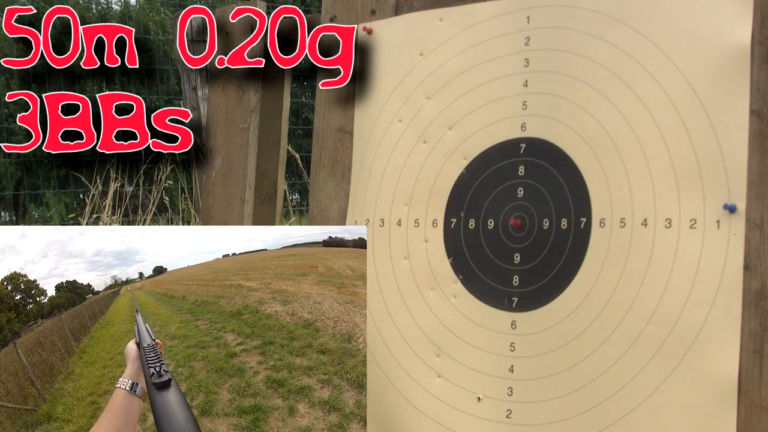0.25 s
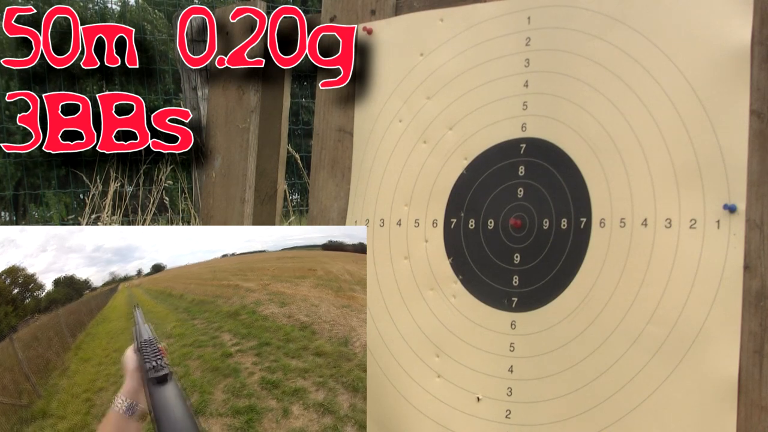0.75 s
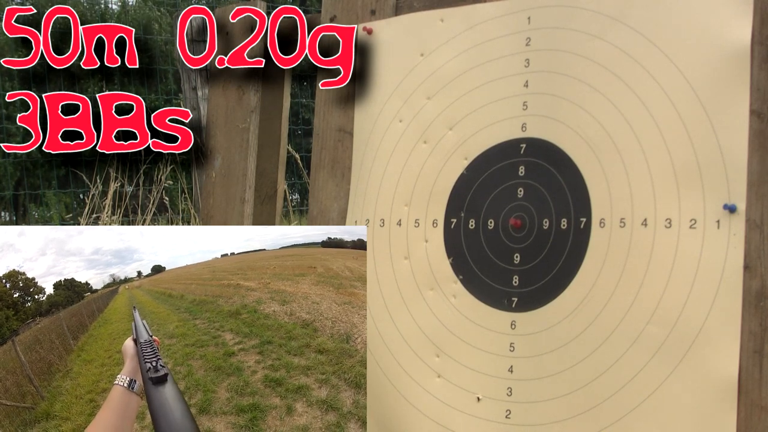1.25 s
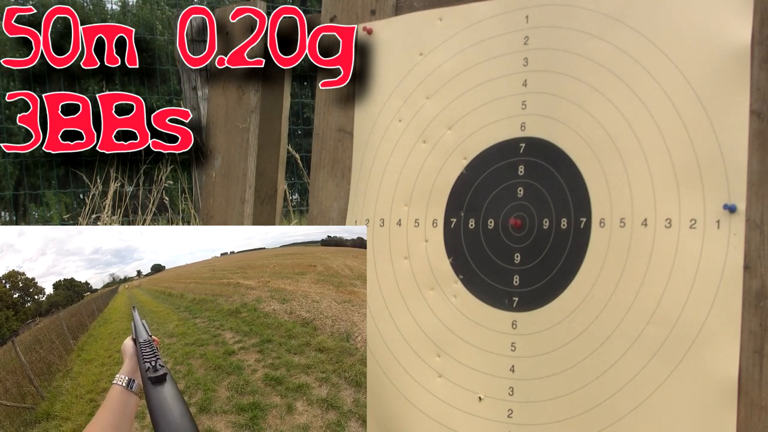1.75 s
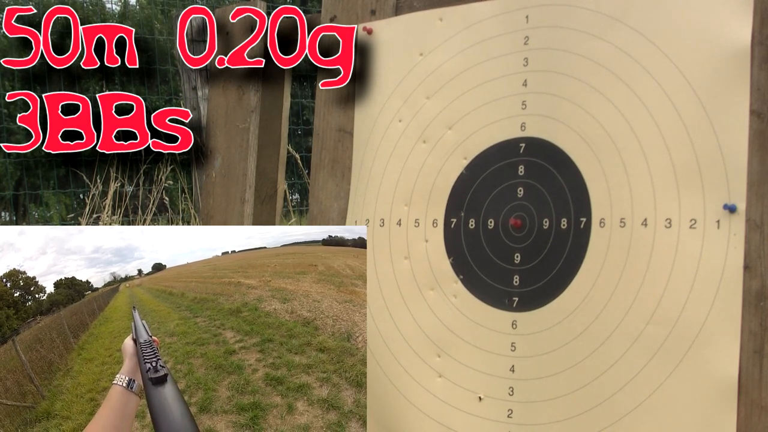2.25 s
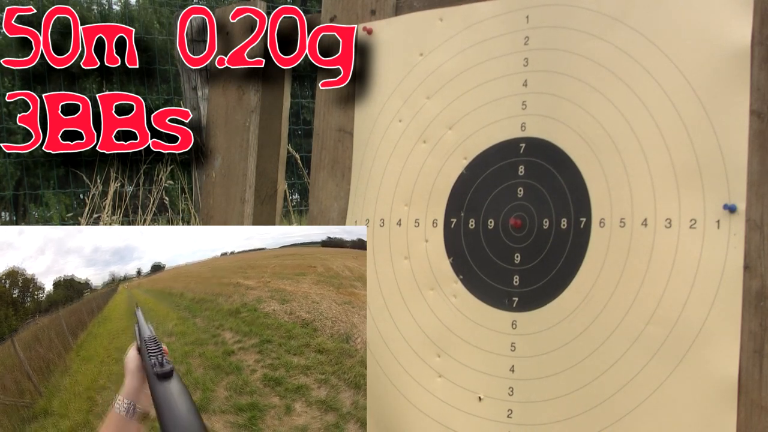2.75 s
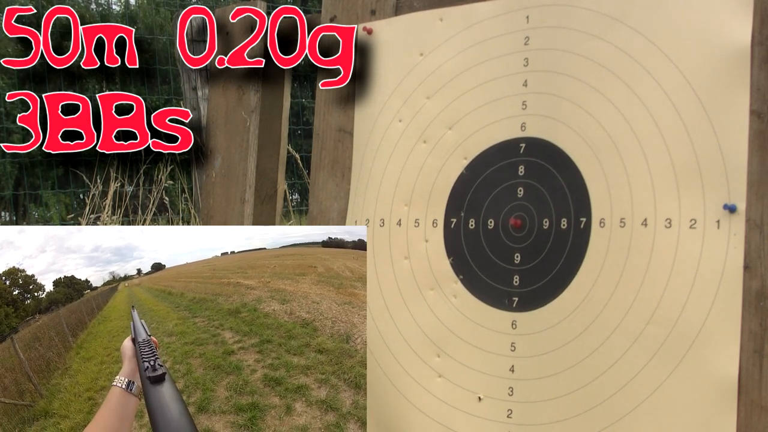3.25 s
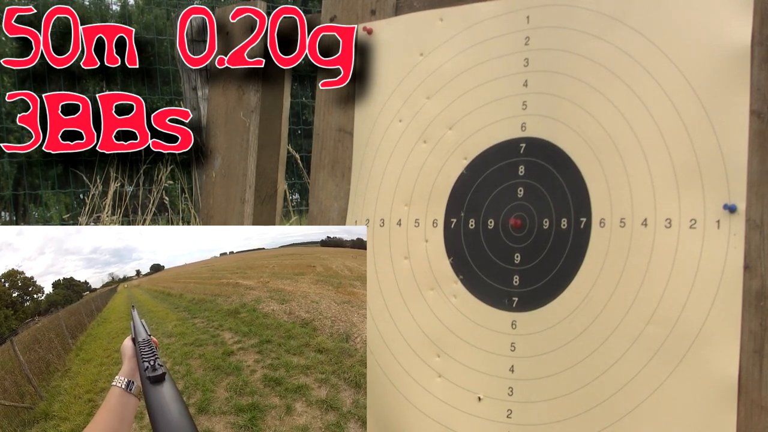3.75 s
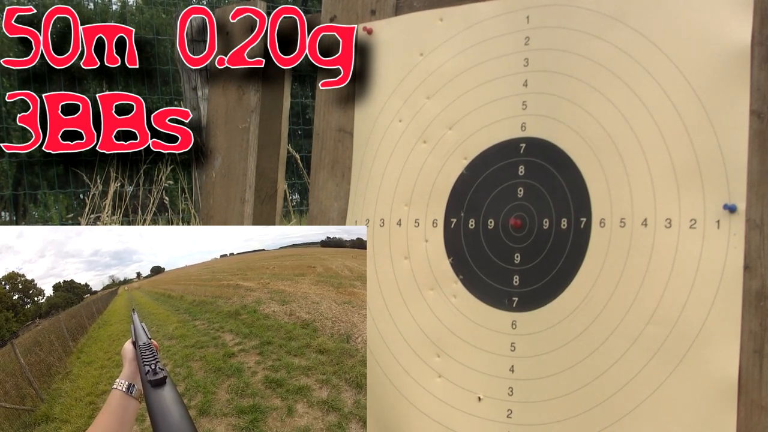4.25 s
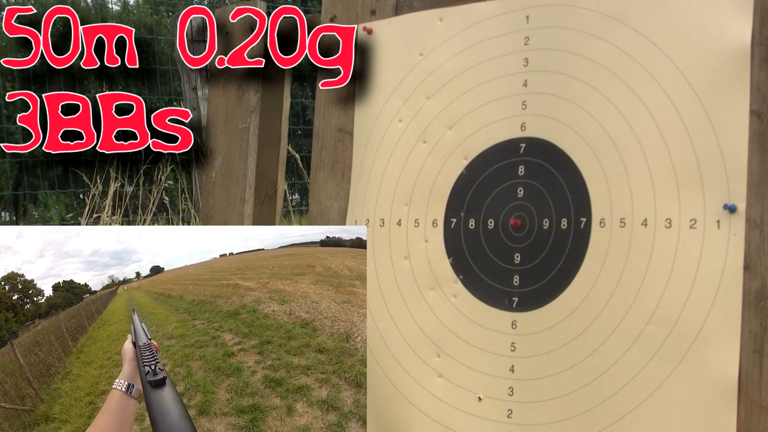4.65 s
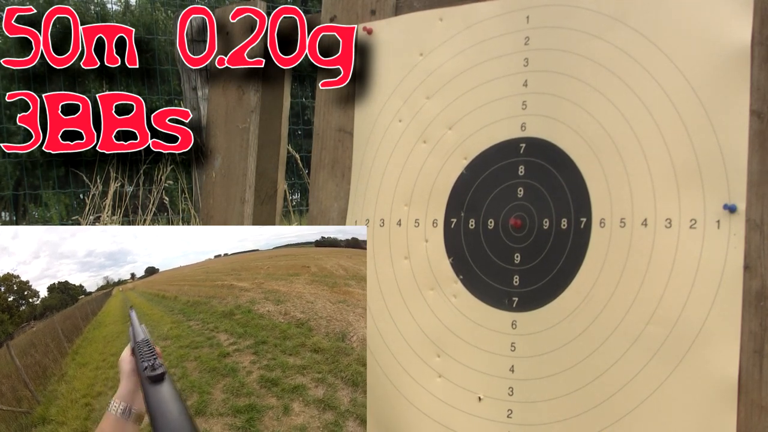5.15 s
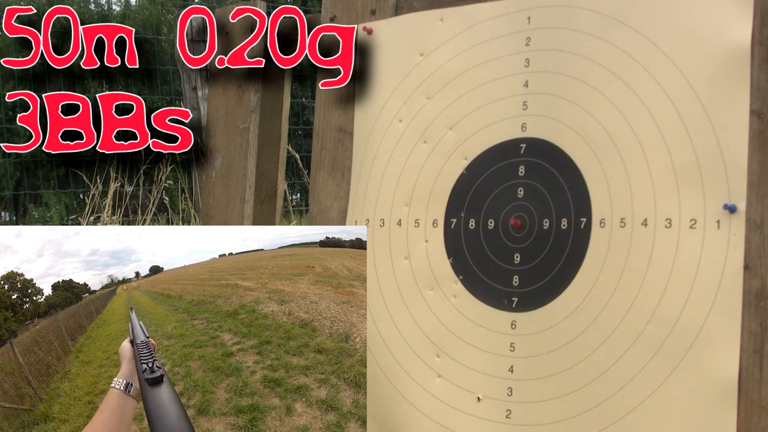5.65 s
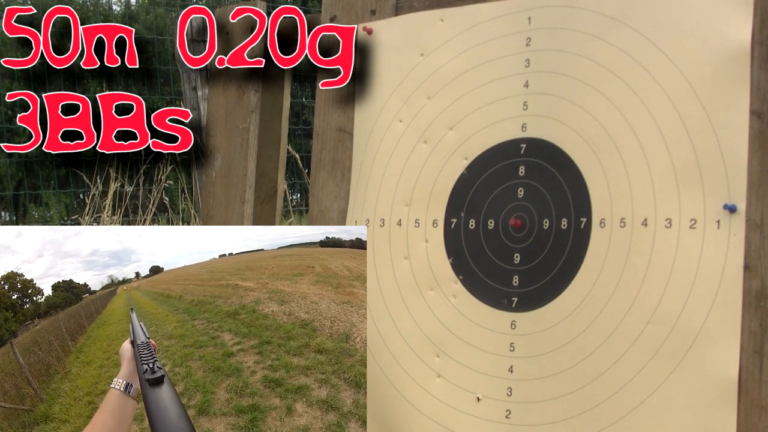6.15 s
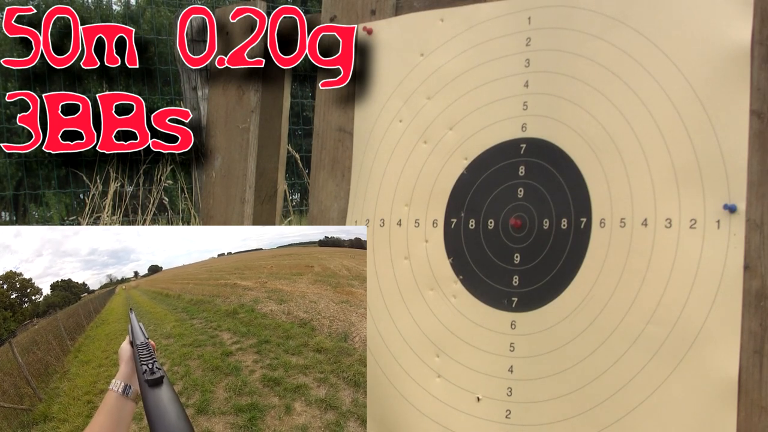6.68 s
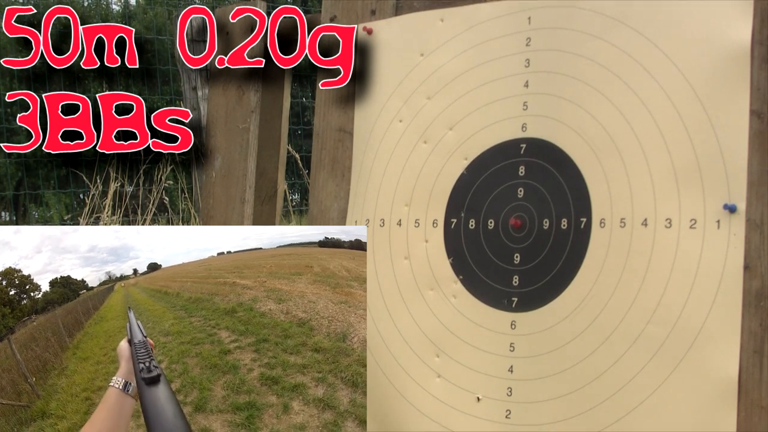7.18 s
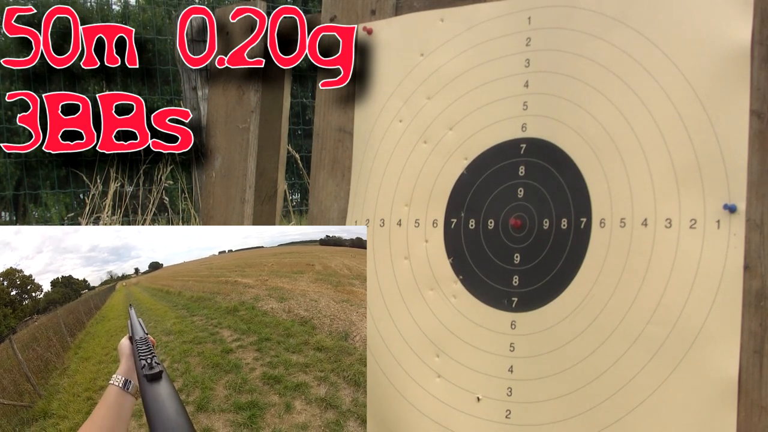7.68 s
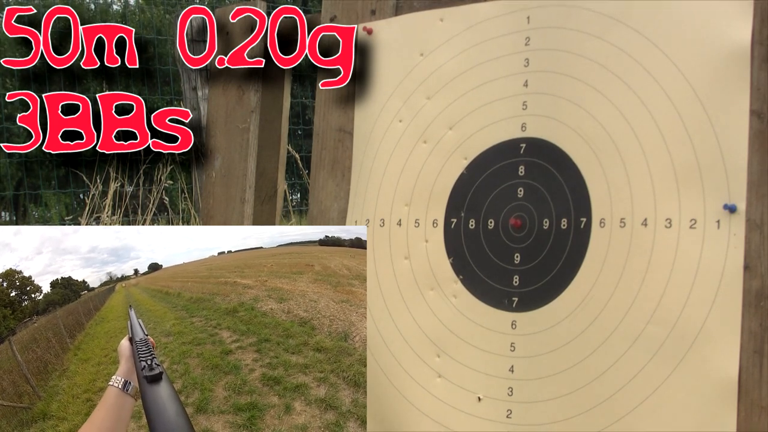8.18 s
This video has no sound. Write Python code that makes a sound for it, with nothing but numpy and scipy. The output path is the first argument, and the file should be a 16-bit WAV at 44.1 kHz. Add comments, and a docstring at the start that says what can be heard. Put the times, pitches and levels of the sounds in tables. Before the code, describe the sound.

Wind flutters and thuds on the microphone, stronger at left, while a plastic pump gun is worked right in front. Each cycle has a bright clattering clack back, a second clack forward with a faint spring ring, a pause, then an overloaded, very short crack and thump with quick echoes and a leafy wash. Four shots sound in all, with distant chirps and light handling ticks between them.

```python
"""A spring airsoft shotgun is pumped and fired four times in an open field, just ahead of a head-worn camera.
Each pump is a rattling pull and a push home, built from shaped noise bursts and gritty scraping.
Each shot is a piston slam of enveloped noise, a stock thump and a muzzle pop that echoes off fence and hedge.
Wind rumbles and bumps on the two microphone ports as swelling filtered noise and short pressure swings;
small birds twitter far away as gliding sines, over distant air and a faint electronic whine."""
import sys
import numpy as np
from scipy import signal
from scipy.fft import rfft, irfft
from scipy.io import wavfile
from scipy.ndimage import uniform_filter1d

SR = 44100
rng = np.random.default_rng(int(sys.argv[2]) if len(sys.argv) > 2 else 0)


def store_pcm(level_fs):
    """Save levels as 16-bit WAV."""
    pcm = np.round(np.clip(level_fs, -1, 1) * 32767).astype(np.int16)
    wavfile.write(sys.argv[1], SR, np.atleast_2d(pcm).T)


N = 371322
TIME = np.arange(N) / SR
EDGE_HZ = 14950  # upper band limit

# shots: piston slam t/s, relative level/dB, left-right balance/dB, share to fence/dB, share to hedge/dB
SHOT_ROWS = [(1.837, -6.5, 0, -5, -4.5), (4.0132, -7.5, -2.5, -4.5, -2.5), (6.089, -8, 1.5, -2, -9.5),
             (7.9007, -7, -0.5, 1.5, -3)]
# colour of the sliding fore-end: f/Hz, relative level/dB per Hz
SLIDE_TONE = [(100, -27), (350, -11.5), (550, -8), (1100, -4), (1500, -4.5), (1750, -4.5), (2300, -5),
              (2900, 0.5), (4500, -2), (7000, 1.5), (9500, -5.5), (12000, -10.5), (15000, -24)]
# big eddies on the windward port: t/s, relative bump level/dB, gust over the breeze/dB
EDDY_HITS = [(0.787, -1.5, 5.5), (.846, -6, 0), (2.086, -6, 9), (2.226, -10.5, 5.5), (2.425, -10.5, 0),
             (3.125, -10.5, 3.5), (3.444, -6.5, 4.5), (3.552, -7.5, 6.5), (3.595, -6.5, -2),
             (3.953, -5.5, 15), (4.311, -6, 8.5), (4.348, -4.5, 8), (5.281, -19.5, 12), (5.49, -15, 5.5),
             (5.525, -6.5, 14), (5.957, -6, 13.5), (6.471, -1, 4), (6.566, -10.5, 8), (6.658, 2, 11),
             (8.186, -4, 10)]


def amp(db):
    """Linear gain of a level in dB."""
    return 10 ** (np.asarray(db) / 20)


def evened(x):
    """Scales to unit rms."""
    return x / np.sqrt(np.mean(x ** 2) + 1e-20)


def read(points, hz, axis=1):
    """A column of a table along log frequency."""
    points = np.array(points, float)
    return np.interp(np.log(hz + 1), np.log(points[:, 0] + 1), points[:, axis])


def add(mix, s, sound):
    """Mixes a sound in at s seconds, cut off at the end of the mix."""
    part = mix[..., max(round(s * SR), 0):][..., :sound.shape[-1]]
    part += sound[..., :part.shape[-1]]


def panned(db):
    """Left and right gains of unit mean power."""
    gains = amp(np.array([db, -db]).reshape(2, -1) / 2)
    return gains / np.sqrt((amp(db) + amp(-db)) / 2)


def convolved(x, taps):
    """Convolution of each channel, cut to the length of the scene."""
    return signal.fftconvolve(np.atleast_2d(x), np.atleast_2d(taps), axes=1)[:, :N]


def coloured(x, tone, size=4096):
    """Minimum-phase filter of unit energy with the given spectrum."""
    log_gain = np.log(amp(read(tone, abs(np.fft.fftfreq(size, 1 / SR)))))
    taps = np.fft.ifft(np.exp(np.conj(signal.hilbert(log_gain)))).real[:size // 2]
    return convolved(x, taps / np.linalg.norm(taps))


def noise(tone):
    """Steady noise of unit rms, unrelated in the two ports."""
    spectrum = rfft(rng.standard_normal((2, N)))
    return evened(irfft(spectrum * amp(read(tone, np.fft.rfftfreq(N, 1 / SR))), N))


def wander(hz):
    """Two random drifts of unit rms, fading out above hz."""
    spectrum = rfft(rng.standard_normal((2, N)))
    return evened(irfft(spectrum * np.exp(-(np.fft.rfftfreq(N, 1 / SR) / hz) ** 2), N))


def port_noise():
    """White noise from the gun: alike in both ports in the bass, with a likeness that varies higher up."""
    # how the two ports hear the gun: f/Hz, likeness/0-1, left lead/rad
    port_match = [(198, 1, 0.11), (1000, 0.77, 0.153), (2090, 0.8, 0.87), (3440, 0.3, 2.18),
                  (5180, 0.77, 2.35), (6420, 0.27, 4.53), (8940, 0.02, 3.94), (12100, 1, 5.08)]
    hz = np.fft.rfftfreq(N, 1 / SR)
    left, other = rfft(rng.standard_normal((2, N)))
    same = np.clip(read(port_match, hz), 0, 1)
    right = (same * left + np.sqrt(1 - same ** 2) * other) * np.exp(-1j * read(port_match, hz, axis=2))
    return irfft(np.array([left, right]), N)


def scatter(t60):
    """Sparse reflections that die away, of unit energy in the left port."""
    t = TIME[:SR]
    taps = rng.standard_normal((2, SR)) * (rng.random((2, SR)) < .1) * 1000 ** (-t / t60)
    return taps / np.linalg.norm(taps[0])


def reflections(echoes):
    """Distinct echoes from ahead, reaching the left port just before the right."""
    taps = np.zeros((2, SR))
    for s, db in echoes:
        add(taps[0], s, amp([db]))
        add(taps[1], s + 2 / SR, amp([db]))
    return taps


def background(whine_hz=3520, whine_db=-78, whine_fall_db=1):
    """Distant air is filtered noise; the camera's thin whine is four harmonic sines, each weaker."""
    # distant air: f/Hz, relative level/dB per Hz
    air_tone = [(100, 4.5), (900, 1), (1700, -2.5), (3500, -4), (10000, -11), (13500, -16.5), (15000, -30)]
    whine = np.zeros(N)
    for k in range(4):
        tone = np.sqrt(2) * np.sin(2 * np.pi * (k + 1) * whine_hz * TIME)
        whine += amp(whine_db - k * whine_fall_db) * tone
    air = noise(air_tone)
    # a little of each port leaks into the other
    return amp(-56.0) * evened(air + 0.098 * air[::-1]) + whine


def birds(warble=0.04, twitter_db=4, chirp_s=.06):
    """Short whistles that swoop down to their lowest pitch or flick up from it, blurred by distance."""
    # notes before the warble: t/s, starting f/Hz, final f/Hz, relative level/dB
    notes = [(.395, 4600, 3320, -64), (2.255, 4500, 3500, -65), (2.32, 3400, 2880, -72),
             (3.0, 3050, 3680, -60), (3.09, 4700, 3190, -57), (3.22, 3200, 3670, -63),
             (3.79, 4500, 3400, -61.5), (3.84, 3300, 2990, -62), (4.485, 4300, 3270, -59),
             (4.835, 3050, 3620, -56), (5.79, 4600, 3220, -58.5), (6.6, 3100, 3550, -60),
             (8.365, 4000, 3170, -54)]
    out = np.zeros(N)
    quaver, flicker = wander(hz=94.4)
    t = np.arange(0, chirp_s, 1 / SR)
    for s, from_hz, to_hz, db in notes:
        height = t / chirp_s if to_hz > from_hz else 1 - t / chirp_s
        glide = min(from_hz, to_hz) + abs(to_hz - from_hz) * height ** 2
        hz = glide * (1 + warble * np.interp(s + t, TIME, quaver))
        whistle = np.sin(2 * np.pi * np.cumsum(hz) / SR)
        add(out, s, amp(db) * signal.windows.tukey(len(t), .5) * whistle)
    out = out * amp(twitter_db * flicker)
    return amp(-3) * out + amp(2) * convolved(out, scatter(t60=0.7))


def wind(rumble_db=-1, rumble_growth=0.8, flutter_db=-8, flutter_growth=1.28,
         flurry_db=5, flurry_s=0.0048, usual_db=-30):
    """Turbulence at each port: a rumble, and a flutter higher up that grows faster in gusts."""
    # slowly swelling breeze strength: t/s, left level/dB, right level/dB
    breeze = [(0.0, -32.5, -32), (0.62, -33.5, -34.5), (0.85, -23.5, -26), (1.3, -29.5, -29.5),
              (1.8, -30.5, -31.5), (2.15, -26, -26), (2.68, -27.5, -25.5), (2.85, -27.5, -37),
              (3.55, -23, -28.5), (3.72, -28.5, -37.5), (4.0, -34, -27), (4.551, -26, -33),
              (4.8, -35.5, -41), (5.95, -33, -28), (6.62, -26.5, -33), (7.2, -31.5, -35.5),
              (8.42, -30, -36.5)]
    # low turbulence: f/Hz, relative level/dB per Hz
    rumble_tone = [(10, -5), (25, -2.5), (50, 1.5), (100, 0), (180, -6.5), (280, -20), (450, -35.5),
                   (900, -63.5), (3000, -79.5)]
    # higher turbulence: f/Hz, relative level/dB per Hz
    flutter_tone = [(40, -15.5), (130, 3.5), (260, -1.5), (400, -12), (700, -29), (1400, -50.5),
                    (5000, -63)]
    gust_s, gust_lead_s = 0.04, .005  # a gust's half length, and how far it peaks ahead of its bump
    gust_lee = .3  # share of the gust's dB at the sheltered port
    lumps_db, flutter_lumps_db, eddy_s = 4.5, 5.5, .11  # depth and longest life of the small eddies
    s, *ports = np.transpose(breeze)
    breeze_db = np.array([np.interp(TIME, s, db) for db in ports]) - usual_db
    gusts_db = sum(rise_db * np.exp(-((TIME - at + gust_lead_s) / gust_s) ** 2)
                   for at, _, rise_db in EDDY_HITS)
    strength_db = breeze_db + np.array([[1], [gust_lee]]) * gusts_db
    flurry = sum(np.exp(-abs(TIME - at) / flurry_s) for at, *_ in EDDY_HITS)  # broken air round each big eddy
    eddies = wander(hz=32.36)
    eddies = np.minimum(evened(eddies - uniform_filter1d(eddies, round(eddy_s * SR))), 2)
    rumble_level = rumble_db + rumble_growth * strength_db + lumps_db * eddies
    rumble = amp(rumble_level) * noise(rumble_tone)
    flutter_level = flutter_db + flutter_growth * strength_db + flutter_lumps_db * eddies + flurry_db * flurry
    flutter = amp(flutter_level) * noise(flutter_tone)
    return amp(usual_db) * (rumble + flutter)


def buffets(cycles=0.11, lee_db=-16, bump_hz=157.4, bump_spread=0.29):
    """An eddy hits the windward left port: one push of pressure and its rebound, its speed varied by chance."""
    t, out = TIME[:SR // 10] - 1 / 20, np.zeros(N)
    for (s, db, _), luck in zip(EDDY_HITS, 2 * rng.random(len(EDDY_HITS)) - 1):
        hz = bump_hz * (1 + bump_spread * luck)
        swing = np.sin(2 * np.pi * hz * t - .5) / np.cosh(t * hz / cycles)
        add(out, s - 1 / 20, -amp(db) * swing)
    return amp([[0], [lee_db]]) * out


def rustle(grain_db=3, start_s=4.33, length_s=0.13, level_db=-50):
    """A sleeve brushes the gun: grainy filtered noise under one smooth swell."""
    # cloth: f/Hz, relative level/dB per Hz
    cloth_tone = [(1000, -6), (1450, 2), (1900, -16), (14000, -43)]
    out = np.zeros(N)
    add(out, start_s, amp(level_db) * signal.windows.hann(round(length_s * SR)))
    return coloured(out * amp(grain_db * wander(hz=120)[0]) * port_noise(), cloth_tone)


def field(gun, forward):
    """Grass scatters all sound; the forward pop comes back crisp from the fence and as a wash from the hedge."""
    # echoes off the fence boards: delay t/s, relative level/dB
    fence_echoes = [(.137, -17.5), (.143, -33)]
    # echoes off the hedge trunks: delay t/s, relative level/dB
    hedge_echoes = [(.169, -50), (.2, -25)]
    # colour of the echoes: f/Hz, relative level/dB
    echo_tone = [(150, -19), (700, -3), (4000, 8.5), (6000, 2), (10000, -3.5), (15000, -45)]
    # colour of the long scatter: f/Hz, relative level/dB
    field_tone = [(150, -27.5), (700, 5.5), (4000, -2), (7000, -4.5), (14000, 3.5)]
    leaves_s, leaves_db, leaves_t60_s = .145, -21, .45  # the foliage's wash: delay, relative level, decay
    s, *_, fence_db, hedge_db = np.transpose(SHOT_ROWS)
    foliage = reflections(hedge_echoes)
    add(foliage, leaves_s, amp(leaves_db) * scatter(t60=leaves_t60_s))
    fence = convolved(forward * amp(np.interp(TIME, s, fence_db)), reflections(fence_echoes))
    hedge = convolved(forward * amp(np.interp(TIME, s, hedge_db)), foliage)
    near = amp(-25.5) * convolved(gun, scatter(t60=0.069))
    far = amp(-29) * coloured(convolved(gun, scatter(t60=1.0)), field_tone)
    return near + far + amp(2.0) * coloured(fence + hedge, echo_tone)


def ringing(modes):
    """Sum of dying modes, one second long."""
    t = TIME[:SR]
    return sum(amp(db - 60 * t / t60) * np.cos(2 * np.pi * hz * t) for hz, db, t60 in modes)


def through_body(x, ring_db):
    """Adds the ring of the gun's body to the blows."""
    # modes of the plastic body and barrel: f/Hz, relative level/dB, t60/s
    body_modes = [(1075, 4, 0.016), (1389, -3, 0.041), (2980, -12.5, 0.1), (4713, -3, 0.07),
                  (5132, -1.5, 0.037), (6270, 0, 0.039), (7150, 2, 0.032), (9250, -17, .06)]
    ring = ringing(body_modes)
    return x + amp(ring_db) * convolved(x, ring / np.linalg.norm(ring))


def clacks(rows, tone, rise_s, snap_s, rattle_s, rattle_db, uneven_db):
    """Each contact is a snap and a chatter of loose parts, and favours its own random bands."""
    size, lead = 4096, .004
    t, hz = TIME[:size] - lead, np.fft.rfftfreq(size, 1 / SR)
    hiss, out = port_noise(), np.zeros((2, N))
    after = np.maximum(t, 0)
    decay = np.hypot(np.exp(-after / snap_s), amp(rattle_db) * np.exp(-after / rattle_s))
    shape = np.exp(np.minimum(t, 0) / rise_s) * decay
    bands = np.linspace(0, np.sqrt(EDGE_HZ), num=40) ** 2  # Hz, closer together in the bass
    lucks = rng.standard_normal((len(rows), len(bands)))
    for k, ((s, db), luck) in enumerate(zip(rows, lucks)):
        favour = evened(amp(uneven_db * np.interp(hz, bands, np.clip(luck, -2, 2))))
        burst = hiss[:, k * size // 2:][:, :size] * shape
        add(out, s - lead, amp(db) * irfft(rfft(burst) * favour))
    return coloured(out, tone)


def scrape(strokes, rub_db, grain_db):
    """The slide rubs along its rails in gritty slips, from the start of a stroke until it locks."""
    rub = np.zeros(N)
    for start, end, *_ in strokes:
        add(rub, start, amp(rub_db) * signal.windows.tukey(round((end - start) * SR), .5))
    grain = evened(amp(grain_db * np.clip(wander(hz=402)[0], -2, 2)))
    return coloured(rub * grain * port_noise(), SLIDE_TONE)


def pump():
    """The slide knocks along its rails, catches the spring and is pushed home; the cocked spring rings."""
    # pulls: start t/s, catch engages t/s, relative catch level/dB
    pulls = [(0.632, 0.6709, -10), (2.673, 2.7195, -9), (4.952, 5.025, -9.5), (6.725, 6.7839, -12)]
    # pushes home: start t/s, latch t/s, relative latch level/dB, cocked spring f/Hz, spring level/dB
    pushes = [(0.813, 0.941, -18, 1397, -55), (2.858, 2.9757, -11.5, 877, -52.5),
              (5.177, 5.291, -11, 876, -52), (6.931, 7.047, -8.5, 913, -62.5)]
    # slide on its lock, rails and back stop: t/s, relative level/dB
    slide_knocks = [(.6115, -32.5), (.617, -26), (.633, -19), (.638, -19.5), (.6545, -14.5), (.6938, -3),
                    (.822, -28.5), (.8315, -22), (.8495, -15.5), (.869, -15), (.909, -27), (.920, -16.5),
                    (.930, -16), (2.660, -31), (2.665, -24.5), (2.678, -29), (2.685, -17), (2.691, -20),
                    (2.7015, -16.5), (2.739, -4.5), (2.756, -25.5), (2.863, -28), (2.871, -22),
                    (2.889, -12.5), (2.903, -15), (2.907, -17.5), (2.955, -24), (2.960, -14.5),
                    (4.950, -28.5), (4.956, -26), (4.973, -29.5), (4.985, -21), (4.993, -21),
                    (5.004, -15.5), (5.0485, -5), (5.1795, -27.5), (5.190, -27.5), (5.208, -16.5),
                    (5.222, -16.5), (5.234, -23.5), (5.265, -33), (5.277, -14.5), (6.718, -31),
                    (6.723, -26), (6.737, -31), (6.745, -26), (6.751, -29), (6.7635, -18.5), (6.802, -12),
                    (6.809, -4.5), (6.951, -25.5), (6.972, -11), (6.985, -25.5), (6.991, -11.5),
                    (7.027, -24.5), (7.035, -16.5), (7.040, -28)]
    # single clicks of the fore-end and of the gun in the hands: t/s, relative level/dB
    click_rows = [(.7845, -25), (2.8255, -26), (3.964, -44), (5.114, -27.5), (5.9848, -43), (6.5661, -42),
                  (6.8675, -26), (7.3372, -35), (7.3528, -37), (8.414, -22)]
    # faint dull taps: t/s, relative level/dB
    tap_rows = [(.3287, -37.5), (.3857, -32.5), (4.348, -39), (4.3917, -40.5), (8.1857, -36.5)]
    # dull colour: f/Hz, relative level/dB per Hz
    dull_tone = [(200, 9.5), (600, 9), (1500, -5), (3000, -18.5), (12000, -37.5)]
    teeth_db, tooth_s = [-5, 1.5, -1, -4.5], .0045  # the catch runs over a few teeth: levels and spacing
    spring_t60_s = .75
    teeth = [(s + k * tooth_s, db + tooth_db) for _, s, db in pulls for k, tooth_db in enumerate(teeth_db)]
    latches = [(s, db) for _, s, db, *_ in pushes]
    knocks = clacks(slide_knocks, SLIDE_TONE, rise_s=0.00048, snap_s=0.001027,
                    rattle_s=0.0068, rattle_db=-2.5, uneven_db=5.5)
    locks = clacks(teeth + latches, SLIDE_TONE, rise_s=0.0008, snap_s=0.0014,
                   rattle_s=0.006, rattle_db=-2, uneven_db=2)
    rubbing = scrape(pulls, rub_db=-35, grain_db=7) + scrape(pushes, rub_db=-34, grain_db=6)
    ticks = clacks(click_rows, SLIDE_TONE, rise_s=0.0005, snap_s=0.0041,
                   rattle_s=0.00848, rattle_db=-9, uneven_db=2.5)
    taps = clacks(tap_rows, dull_tone, rise_s=0.0015, snap_s=0.0034,
                  rattle_s=0.011, rattle_db=-8, uneven_db=-3.5)
    # the fore-end hits home
    hollow = amp(-7.5) * clacks(latches, dull_tone, rise_s=0.00079, snap_s=0.0035,
                                rattle_s=0.013, rattle_db=-15.5, uneven_db=5.5)
    spring = np.zeros(N)
    for _, s, _, hz, db in pushes:
        add(spring, s, ringing([(hz, db, spring_t60_s)]))
    bright = through_body(knocks + locks + rubbing + ticks, ring_db=-23.0)
    return bright * panned(0.61) + taps + hollow + spring


def shots(pop_db=4, pop_s=0.00021, pop_at=0.0061, ground_at=0.014, ground_db=-7,
          thump_db=-15, thump_hz=231, thump_t60=0.16):
    """The piston runs and slams, the stock thumps, then air pops from the muzzle and bounces off the ground."""
    # piston run, its end, slam, bounce, air release, its tail, spring recoil:
    # t/s after the slam, relative level/dB, rise/s, decay/s
    stages = [(-.0045, -8.5, 0.0011, 0.0051), (-.001, -15, .001, .002), (.0006, 3.5, 0.00034, 0.0068),
              (.004, -5.5, .0004, 0.00096), (.0075, 5, 0.00088, .0016), (.0095, -17.5, 0.001007, .012),
              (0.0303, -14.5, .0012, 0.0021)]
    # colour of the blows: f/Hz, relative level/dB per Hz
    blow_tone = [(60, -22), (200, -10.5), (450, -2), (700, -1.5), (1050, -2), (1500, -6), (2700, -3),
                 (4000, -3), (5500, -1), (7000, 2), (9000, -7), (12000, -15.5), (15000, -30)]
    lead = .03
    t = TIME[:SR // 5] - lead
    power = sum(amp(db) ** 2 * np.exp(2 * np.minimum((t - s) / rise, (s - t) / decay))
                for s, db, rise, decay in stages)
    after = np.maximum(t, 0)
    thump = amp(thump_db - 60 * after / thump_t60) * np.sin(2 * np.pi * thump_hz * after)
    # a sharp pressure jump that dips below zero and recovers
    u = TIME[:SR // 5] / pop_s
    pop = amp(pop_db) * (1 - u) * np.exp(-u)
    blows, thumps, bounces, pops = np.zeros((4, 2, N))
    for s, db, side_db, *_ in SHOT_ROWS:
        add(blows, s - lead, amp(db) * panned(side_db) * np.sqrt(power))
        add(thumps, s - lead, amp(db) * thump)
        add(bounces, s + ground_at, amp(db + ground_db) * pop)
        add(pops, s + pop_at, amp(db) * pop)
    slams = through_body(coloured(blows * port_noise(), blow_tone), ring_db=-26.5)
    return slams + thumps + bounces, pops


def scene():
    """The gun, its echoes from the field, wind on the ports, a sleeve and the far background."""
    action, pops = shots()
    gun = action + pops + pump()
    forward = (pops + amp(-15.5) * action).mean(0)  # the muzzle throws its pop downrange
    return gun + field(gun, forward) + wind() + buffets() + birds() + background() + rustle()


def record(dry):
    """The input clips at full scale, where slams overload it; then a low-pass sets the band limit."""
    clipped = np.clip(dry, -1, 1)
    low_pass = signal.firwin(255, EDGE_HZ, window=("kaiser", 7), fs=SR)
    return signal.oaconvolve(clipped, low_pass[None], "same")


dry = scene()
out = record(dry)
store_pcm(out)
```